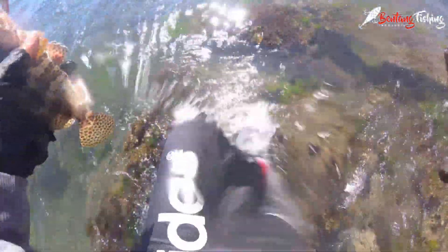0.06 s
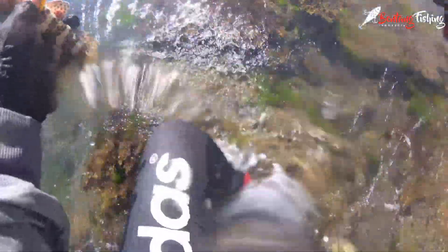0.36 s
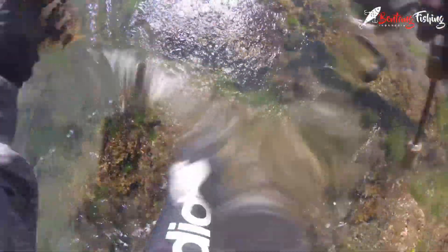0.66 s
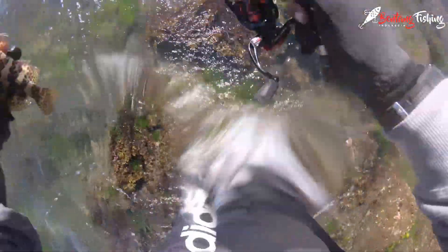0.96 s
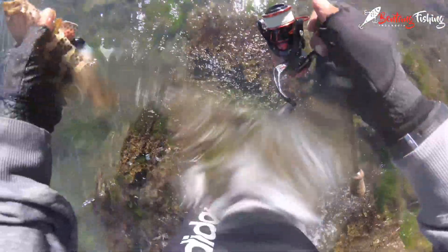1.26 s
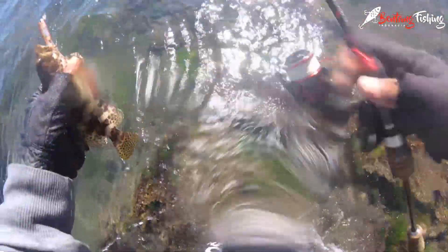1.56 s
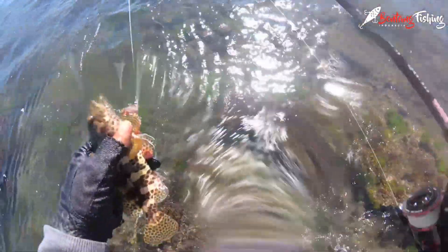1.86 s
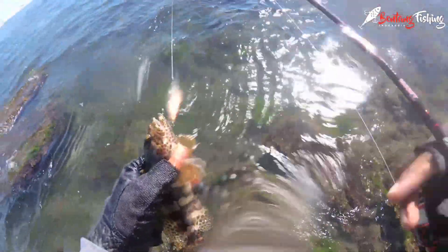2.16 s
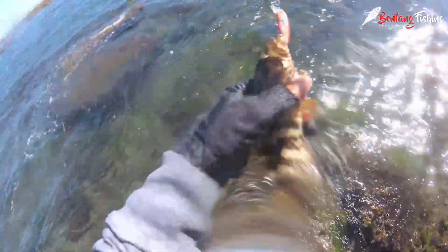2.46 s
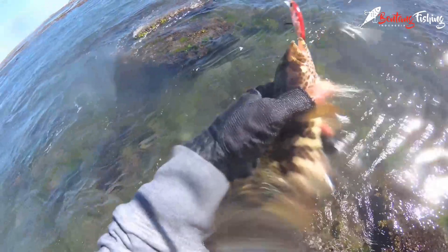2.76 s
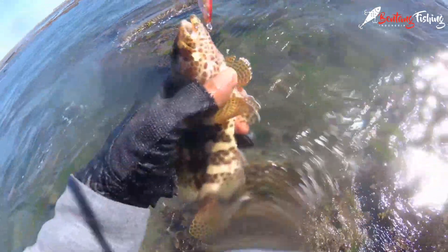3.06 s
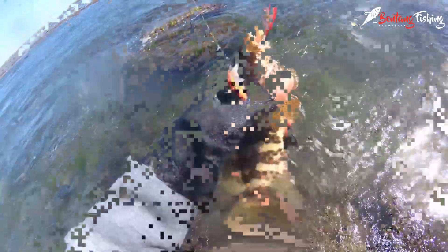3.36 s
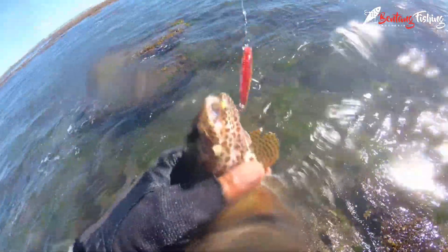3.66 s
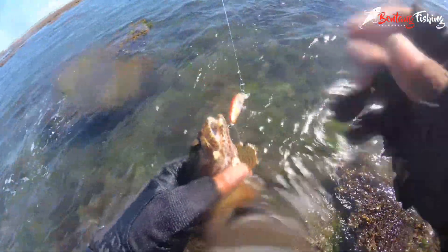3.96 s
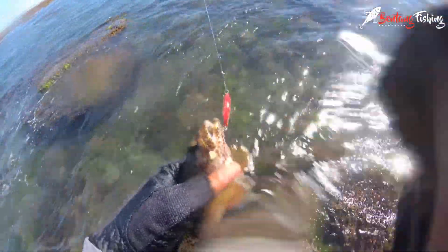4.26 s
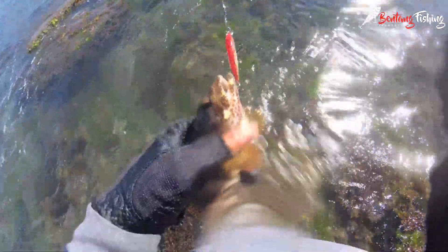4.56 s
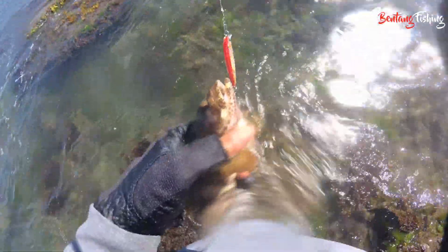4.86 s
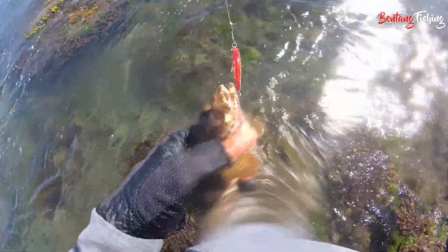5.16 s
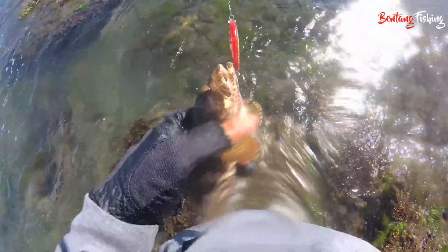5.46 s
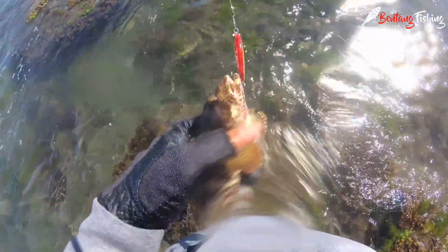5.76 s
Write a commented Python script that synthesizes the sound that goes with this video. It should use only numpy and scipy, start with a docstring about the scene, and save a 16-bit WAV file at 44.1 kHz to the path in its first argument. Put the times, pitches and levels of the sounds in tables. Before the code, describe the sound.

Heard from a camera worn by someone standing in the shallows, water swishes and bubbles quietly while gear gives a few light taps and a couple of sharper knocks. In the last part a glove takes hold of the plastic case, rubbing, sticking and creaking right at the microphone. Heavy thumps and clicks follow, far louder than the water, and the strongest ones distort.

```python
"""Water washes softly round someone's legs while gear taps; then come close scrapes, creaks and loud knocks.
An angler stands in shallow water, wearing a camera in a plastic housing. The water sounds through its
sloshing, bubbles and drops. Then a gloved hand takes hold of the housing: the fabric rubs, sticks
and slips on it, and the hand knocks it hard enough to overload the microphones."""
import sys
import numpy as np
from scipy import signal
from scipy.fft import rfft, irfft
from scipy.io import wavfile

SR = 44100
rng = np.random.default_rng(int(sys.argv[2]) if len(sys.argv) > 2 else 0)


def transcribe(u):
    """Save the signal u as a 16-bit wav file named by the first command-line argument.

    u: samples, shape (n,) or (channels, n), limited to [-1, 1]; the rate is SR.
    q: integer samples, one column per channel.
    """
    v = np.clip(np.atleast_2d(u).T, -1, 1)
    q = np.round(v * 32767).astype(np.int16)
    wavfile.write(sys.argv[1], SR, q)


N = 261336
TIME = np.arange(N) / SR
STROKE_RISE = 0.69  # share of a glove stroke spent pressing harder

# how alike water sounds at the two microphones: (frequency [Hz], likeness [-1 to 1])
WATER_LIKENESS = [(60, 1), (300, 0.7), (700, 0.9), (1400, 0.82), (3100, -0.02), (6000, 0)]
# the same for a touch on the housing: (frequency [Hz], likeness [-1 to 1])
TOUCH_LIKENESS = [(100, 0.92), (700, 0.94), (1500, 0.96), (3100, 0.18), (6500, -0.37), (12000, 0.22)]
# which side a touch is louder on: (frequency [Hz], left minus right [dB])
TOUCH_BALANCE = [(80, -6), (250, -3.5), (700, -3), (2300, -4), (4400, -10.5), (8000, -4), (15000, -8)]
# tone of fabric rubbing on plastic: (frequency [Hz], relative level [dB])
RUB_TONE = [(210, -34), (350, 4.5), (491, -5.5), (672, 4), (771, -7), (942, 1.5), (1040, -7.5), (1320, 1),
            (1850, -9.5), (2100, 0.5), (3060, -13), (3510, -2), (4240, -18), (5590, -10.5), (7000, -79),
            (9100, -53), (15400, -120)]


def amp(db):
    """Turns decibels into a gain to multiply by."""
    return 10 ** (np.asarray(db) / 20)


def evened(x):
    """Scales a sound to an average (rms) strength of 1."""
    return x / np.sqrt(np.mean(x ** 2) + 1e-20)


def read(points, hz):
    """Looks up a frequency in a table, blending between rows on a log scale."""
    row_hz, value = np.transpose(points)
    return np.interp(np.log(hz + 1), np.log(row_hz + 1), value)


def add(mix, start_s, sound):
    """Mixes a stereo sound in at its start time."""
    part = mix[:, max(round(start_s * SR), 0):][:, :sound.shape[1]]
    part += sound[:, :part.shape[1]]


def panned(db):
    """Left and right gains; positive dB is louder on the left."""
    return amp(np.array([db, -db]).reshape(2, -1) / 2)


def swell(peak_s, length, rise):
    """Climbs to 1 at peak_s and falls back; rise is the share of the length spent climbing."""
    times = [peak_s - rise * length, peak_s, peak_s + (1 - rise) * length]
    return np.interp(TIME, times, [0, 1, 0]) ** 0.58


def flutter(per_s):
    """A random wobble, up to about per_s times a second."""
    hz = np.fft.rfftfreq(N, 1 / SR)
    return evened(irfft(rfft(rng.standard_normal(N)) / (1 + (hz / per_s) ** 4), N))


def grains(tone, likeness, balance, per_s, grain_db):
    """Stereo noise of a given tone, made grainy by a flickering level."""
    hz = np.fft.rfftfreq(N, 1 / SR)
    noise = rng.standard_normal((2, N))
    flicker = amp(grain_db * np.clip(flutter(per_s), -2.5, 2.5))
    left, other = rfft(noise * flicker)
    alike = np.clip(read(likeness, hz), -1, 1)
    right = alike * left + np.sqrt(1 - alike ** 2) * other
    low_hz, high_hz = tone[0][0], tone[-1][0]
    edge_fade = 1 / np.sqrt((1 + (low_hz / 2 / (hz + 1)) ** 4) * (1 + (hz / 2 / high_hz) ** 4))
    pair = np.array([left, right]) * panned(read(balance, hz))
    sound = irfft(pair * amp(read(tone, hz)) * edge_fade, N)
    return sound / sound.mean(0).std()


def coloured(pulses, tone, size=4096):
    """Makes each pulse ring with the given tone after it lands."""
    log_gain = np.log(amp(read(tone, abs(np.fft.fftfreq(size, 1 / SR)))))
    ring = np.fft.ifft(np.exp(np.conj(signal.hilbert(log_gain)))).real
    return signal.oaconvolve(pulses, ring[:size // 2])[:N]


def touch_lag(hz):
    """How far out of step a note from the housing reaches the two microphones, in radians."""
    return np.arccos(np.clip(read(TOUCH_LIKENESS, hz), -1, 1))


def hiss(level_db=-57):
    """The microphones give a faint, steady hiss of their own."""
    # tone of the hiss: (frequency [Hz], relative level [dB])
    tone = [(1470, -5.5), (2500, -4), (3570, 0), (4310, -5), (5740, -5.5), (14600, -5.5), (15600, -8),
            (16000, -31)]
    balance = [(2500, 0.052), (15000, -0.024)]  # (frequency [Hz], left minus right [dB])
    return amp(level_db) * grains(tone, WATER_LIKENESS, balance, per_s=51, grain_db=0.63)


def droplets(per_s=260, spread_db=2.0, pitches=24):
    """Falling drops trap tiny bubbles, each a short rising ping."""
    out, t = np.zeros((2, N)), np.arange(SR // 60) / SR
    for hz in np.geomspace(1900, 5800, pitches):
        cycles = hz * rng.uniform(0.953, 0.958) * t
        fade = np.exp(-cycles / 7) * (1 - np.exp(-cycles))
        ping = fade * np.sin(2 * np.pi * cycles * (1 + 0.0057 * cycles))
        size = amp(spread_db * np.minimum(rng.exponential(1, N), 3.5))
        lands = rng.random(N) < per_s / pitches / SR
        out += signal.oaconvolve(size * lands, ping)[:N] * panned(rng.normal(1, 1.6))
    return evened(out)


def water(slosh_db=-45.5, lap_db=-50.5, spray_floor_db=-79, heave_db=-4.5, drops_db=-4):
    """Water sloshes and laps all the time; each swish heaves it and throws up froth, spray and drops."""
    # tones of slosh, lapping, bursting bubbles and spray: (frequency [Hz], relative level [dB])
    slosh_tone = [(25, -24), (60, -19), (115, -3.5), (170, -2), (240, 1.5), (330, -4), (450, -12),
                  (900, -18.5)]
    lap_tone = [(200, -15), (450, 2.5), (760, 6), (950, 5), (1120, -12), (1450, 4.5), (1700, -4),
                (1950, -33.5), (4000, -50.5)]
    froth_tone = [(400, -5), (700, -1.5), (930, 2), (1120, -4.5), (1450, 1.5), (1700, -3.5), (1950, -15.5),
                  (4000, -32)]
    spray_tone = [(900, -32), (1900, -3), (2500, 1), (3100, 2.5), (3600, 1.5), (4400, -8.5), (5500, -5),
                  (6600, -12), (15000, -18)]
    # which side the water is louder on: (frequency [Hz], left minus right [dB])
    balance = [(60, -7), (200, -3), (600, -2), (1300, -3.5), (4400, -9.5), (8000, -4.5)]
    # swishes round the legs: (peak time [s], length [s], froth level [dB], spray level [dB])
    swishes = [(0.194, 0.74, -51, -49.5), (0.442, 0.21, -48, -43), (0.589, 0.35, -37.5, -47),
               (0.84, 0.23, -43, -54.5), (1.049, 0.24, -42, -49), (1.196, 0.24, -45.5, -49),
               (1.385, 0.33, -65, -49), (2.141, 0.28, -43.5, -59.5), (2.36, .12, -43, -60),
               (2.573, 0.21, -39.5, -56.5), (2.955, 0.25, -40, -68), (3.427, 0.058, -41, -51.5),
               (3.7, 0.49, -46, -68), (4.137, 0.15, -46, -78)]
    froth_gain, spray_gain = np.zeros(N), amp(spray_floor_db)
    for peak_s, length, froth_db, spray_db in swishes:
        surge = swell(peak_s, length, rise=0.42)
        froth_gain = np.hypot(froth_gain, surge * amp(froth_db))  # hypot adds the power of two noises
        spray_gain = np.hypot(spray_gain, surge * amp(spray_db))
    slosh_gain = np.hypot(amp(slosh_db), amp(heave_db) * froth_gain)
    slosh = slosh_gain * grains(slosh_tone, WATER_LIKENESS, balance, per_s=25, grain_db=1.8)
    lap = amp(lap_db) * grains(lap_tone, WATER_LIKENESS, balance, per_s=89, grain_db=2.5)
    froth = froth_gain * grains(froth_tone, WATER_LIKENESS, balance, per_s=130, grain_db=3)
    spray = grains(spray_tone, WATER_LIKENESS, balance, per_s=180, grain_db=3)
    return slosh + lap + froth + spray_gain * (spray + amp(drops_db) * droplets())


def plops(fade_s=0.021):
    """A larger drop traps a bubble that rings, dying away by 60 dB in fade_s."""
    # trapped bubbles: (time [s], level [dB], pitch [Hz])
    bubbles = [(0.206, -28, 930), (1.177, -31, 830), (2.03, -41, 4080), (3.113, -33.5, 1370)]
    out, t = np.zeros((2, N)), np.arange(SR // 20) / SR
    for start_s, db, hz in bubbles:
        add(out, start_s, amp(db - 60 * t / fade_s) * np.sin(2 * np.pi * hz * t) * panned(-4))
    return out


def snags(per_s=420, spread_db=1.5):
    """Single threads catch and snap free at random, each a tiny click."""
    size = amp(spread_db * np.minimum(rng.exponential(1, N), 3))
    snaps = size * rng.choice([-1, 1], N) * (rng.random(N) < per_s / SR)
    return evened(coloured(snaps, RUB_TONE)) * panned(-4)


def glove(rest_rub_db=-45.5, rest_rumble_db=-37, rest_hiss_db=-49, snag_db=-8):
    """Fabric drags over the housing: each stroke swells and lets go as the fibres catch."""
    # the hand resting on the housing: (time [s], share of its weight [0 to 1])
    grip = [(4.37, 0.033), (4.41, 1), (5.33, 0.55), (5.42, 0.34)]
    # glove strokes: (peak time [s], length [s], rub level [dB], rumble level [dB], hiss level [dB])
    strokes = [(4.425, 0.066, -29, -32, -39), (4.486, 0.059, -23, -17.5, -33),
               (4.538, 0.061, -27.5, -26, -37), (4.619, 0.093, -24, -26, -27),
               (4.673, 0.07, -23.5, -25, -32), (4.979, 0.19, -32, -32, -37),
               (5.042, 0.095, -23.5, -24, -34), (5.107, 0.045, -39.5, -27, -39),
               (5.293, 0.19, -37.5, -38.5, -49.5), (5.366, 0.04, -32.5, -37, -39.5),
               (5.49, 0.047, -33.5, -35, -41.5), (5.605, 0.18, -43, -41, -54),
               (5.896, 0.13, -39.5, -34.5, -46.5)]
    # tones of the rubbing's low rumble and high hiss: (frequency [Hz], relative level [dB])
    rumble_tone = [(25, -9.5), (60, -14), (115, -5.5), (170, -1), (260, -0.5), (400, -16.5), (800, -11)]
    hiss_tone = [(3000, -17), (5500, 4), (7000, 5), (10000, -1), (13000, 0.5), (15000, -1.5)]
    held = np.interp(TIME, *np.transpose(grip))  # the resting hand never lies quite still
    gains = held * amp([[rest_rub_db], [rest_rumble_db], [rest_hiss_db]])
    for peak_s, length, *db in strokes:
        gains = np.maximum(gains, swell(peak_s, length, STROKE_RISE) * amp(db)[:, None])
    rub_gain, rumble_gain, hiss_gain = gains
    rub = grains(RUB_TONE, TOUCH_LIKENESS, TOUCH_BALANCE, per_s=160, grain_db=3.5)
    rub += amp(snag_db) * snags()
    rumble = grains(rumble_tone, TOUCH_LIKENESS, TOUCH_BALANCE, per_s=70, grain_db=2.5)
    high_hiss = grains(hiss_tone, TOUCH_LIKENESS, TOUCH_BALANCE, per_s=1100, grain_db=1)
    return rub_gain * rub + rumble_gain * rumble + hiss_gain * high_hiss


def rasps():
    """Where the fabric grips, it chatters around one pitch: a short, fuzzy squeak."""
    # fabric squeaks: (peak time [s], length [s], pitch [Hz], pitch width [Hz], level [dB])
    squeaks = [(4.426, 0.019, 1230, 403, -25), (4.603, 0.073, 3360, 1200, -24.5),
               (4.613, 0.11, 1555, 600, -25.5), (4.671, 0.036, 5550, 400, -24),
               (4.676, 0.05, 2127, 250, -23.5), (5.054, 0.023, 2100, 900, -23.5),
               (5.11, 0.042, 3640, 260, -32.5), (5.367, 0.03, 780, 340, -23),
               (5.369, 0.028, 1960, 864, -27.5), (5.48, 0.0076, 12100, 3500, -31.5)]
    out = np.zeros((2, N))
    for peak_s, length, hz, width_hz, db in squeaks:
        noise = rng.standard_normal(N) + 1j * rng.standard_normal(N)
        wobble = signal.lfilter(*signal.butter(2, width_hz / 2, fs=SR), noise)
        note = wobble * np.exp(2j * np.pi * hz * TIME)
        pair = evened(np.real([note, note * np.exp(1j * touch_lag(hz))]))
        out += amp(db) * swell(peak_s, length, STROKE_RISE) * pair * panned(read(TOUCH_BALANCE, hz))
    return out


def creaks():
    """The glove sticks and slips, one short pulse a slip; the slips speed up and slow with the pull."""
    # pulls of the glove, one list a creak: (time [s], slip rate [1/s], level [dB])
    pulls = [
        [(4.695, 330, -37.5), (4.712, 480, -28), (4.722, 680, -21.5), (4.735, 800, -32), (4.746, 950, -24.5),
         (4.758, 300, -39), (4.785, 117, -36)],
        [(4.795, 144, -38.5), (4.805, 174, -25), (4.813, 260, -25.5), (4.837, 290, -19.5), (4.847, 470, -19),
         (4.859, 474.8, -24.5), (4.879, 350, -21), (4.889, 320, -25), (4.9, 150, -21)],
    ]
    # tone of one slip: (frequency [Hz], relative level [dB])
    slip_tone = [(80, -9), (250, 8.5), (450, 4.5), (650, 6), (900, 3), (1150, -10), (1450, -4.5),
                 (2000, -31), (4000, -68)]
    slip_strength = np.linalg.norm(coloured(signal.unit_impulse(SR), slip_tone))
    out = np.zeros((2, N))
    for pull in pulls:
        times, slip_hz, db = np.transpose(pull)
        rate = np.interp(TIME, times, slip_hz) * (1 + 0.025 * flutter(140))
        slip_count = np.cumsum(rate * (TIME > times[0]) * (TIME < times[-1])) / SR
        slips = np.diff(np.ceil(slip_count), prepend=0) * np.sqrt(SR / rate)  # same power at any rate
        force = amp(np.interp(TIME, times, db) + 1.4 * flutter(200))
        out -= coloured(slips * force, slip_tone) / slip_strength * panned(-3.5)
    return out


def housing_ring(t, hardness_hz, pitch_spread=0.04):
    """The plastic shell rings with many notes at once; a soft touch leaves the high ones quiet."""
    # the shell's own notes: (pitch [Hz], relative level [dB], time to fade by 60 dB [s])
    shell_notes = [(238, -13, 0.041), (678, -8, 0.033), (858, 0.5, 0.016), (1230, 1, 0.012),
                   (1318, 0, 0.019), (1734, 4, 0.012), (2304, -6, 0.02), (2360, 4, 0.018),
                   (3220, 5, 0.0057), (3800, -5.5, 0.03), (5620, -14, 0.046), (7500, -5, 0.0089),
                   (8800, -12, .006), (13000, -8, .005)]
    hz, db, fade_s = np.transpose(shell_notes)[:, :, None]
    hz = hz * (1 + pitch_spread * rng.standard_normal(hz.shape))
    weight = amp(db) / np.sqrt(1 + (hz / hardness_hz) ** 6)
    sign = (-1) ** np.arange(len(hz))[:, None]  # neighbouring notes swing opposite ways
    fades = sign * weight * amp(-60 * t / fade_s) / np.linalg.norm(weight)
    return 0.5 * np.array([(fades * np.sin(2 * np.pi * hz * t + lag)).sum(0)
                           for lag in (0, touch_lag(hz))])


def thud(t, db, hz, fade_s, max_sag=0.36, hard_db=8.5):
    """The touched spot rocks and dies away; after a hard blow its pitch sags as the contact relaxes."""
    sag = max_sag * np.tanh(amp(db - hard_db))
    pitch = hz * (1 + sag * (2 * np.exp(-t / (0.23 * fade_s)) - 1))  # from above hz to below it
    return amp(db - 60 * t / fade_s) * np.sin(2 * np.pi * np.cumsum(pitch) / SR)


def contacts(tap_hardness_hz=1100, click_hardness_hz=5200, knock_cycles=3.2, click_cycles=13, pan_db=-4):
    """Lists every tap, knock and click on the housing, ready for knocks() to play."""
    # gear bumps the free housing: (time [s], thud level [dB], pitch [Hz], ring level [dB])
    gear_taps = [(.572, -23, 124, -22), (0.616, -22, 236, -16), (.657, -29, 112, -32),
                 (1.548, -38, 135, -21), (1.728, -34, 122, -18.5), (2.1983, -33, 210, -15),
                 (2.436, -37, 127, -19.5), (2.862, -22, 696, -42), (2.871, -16, 205.6, -40),
                 (2.9001, -4.5, 259, 1.5), (2.9861, -4, 700, -4.5), (2.991, -21.5, 244, -22),
                 (3.907, -40, 218, -16)]
    # the hand hits the housing and damps it:
    # (time [s], thud level [dB], pitch [Hz], ring level [dB], hardness [Hz], crack level [dB])
    hand_knocks = [(4.441, -2.5, 130, -31, 600, -35), (4.471, -1.5, 139, -21, 800, -40),
                   (4.4772, 0, 190, -10, 910, -38), (4.4869, -1, 113, -0.5, 1500, -33),
                   (4.5266, -6, 267, -6.5, 2410, -25), (4.7488, -7.5, 235, -4, 6000, -2),
                   (4.945, -21, 700, 13, 1670, -32), (5.089, -24, 260, -14, 2500, -29),
                   (5.423, -1.5, 470, 1, 1270, -21.5), (5.5056, 3, 487, 2.5, 3250, -1.5),
                   (5.5648, 21, 322, 11.5, 2300, 0.5), (5.6842, -6, 230, 9.5, 3880, 11),
                   (5.86, 16, 233, 6, 1660, 6), (5.8735, -28, 610, -2, 2160, -8.5)]
    # a hard edge catches on the shell: (time [s], level [dB], pitch [Hz], left minus right [dB])
    edge_clicks = [(4.371, -22, 1470, -11), (4.436, -12, 2270, 8), (4.7721, -11, 1830, -6),
                   (4.8928, -5.5, 2840, -14), (5.516, -18, 3500, 11), (5.599, -20, 2470, -15),
                   (5.642, -9.5, 3500, -10)]
    for start_s, db, hz, ring_db in gear_taps:
        fade_s = 0.049 * np.sqrt(197 / hz)  # low thuds last longer
        yield start_s, db, hz, fade_s, ring_db, tap_hardness_hz, 0, pan_db
    for start_s, db, hz, ring_db, hardness_hz, crack_db in hand_knocks:
        yield start_s, db, hz, knock_cycles / hz, ring_db, hardness_hz, amp(crack_db), pan_db
    for start_s, db, hz, side_db in edge_clicks:
        ring_db, crack_gain = db - 5, amp(db + 1)
        yield start_s, db, hz, click_cycles / hz, ring_db, click_hardness_hz, crack_gain, side_db


def knocks(attack_cycles=0.84, crack_s=0.0085, rattle_db=-29, rattle_s=0.079,
           murmur_db=-30, murmur_s=0.074, bass_cut_hz=70):
    """A blow thuds and rings the shell; hard contacts add a crack and a faint rattle."""
    # tone of a hard contact: (frequency [Hz], relative level [dB])
    crack_tone = [(1200, 2.5), (3300, 4.5), (5500, -0.5), (9000, -5.5), (14000, -4.5)]
    # the shell and the body behind it murmur on after a blow: (frequency [Hz], relative level [dB])
    murmur_tone = [(80, 7.5), (130, -26), (240, 18.5), (330, -35), (460, 19), (720, -13), (1080, 2),
                   (1450, -5), (1850, -15), (3600, -18), (6000, -47)]
    out, t = np.zeros((2, N)), np.arange(SR // 5) / SR
    crack_noise = grains(crack_tone, TOUCH_LIKENESS, TOUCH_BALANCE, per_s=1500, grain_db=1)
    murmur_noise = grains(murmur_tone, TOUCH_LIKENESS, TOUCH_BALANCE, per_s=40, grain_db=1.5)
    crack_fade = amp(-60 * t / crack_s) + amp(rattle_db - 60 * t / rattle_s)
    for start_s, thud_db, hz, fade_s, ring_db, hardness_hz, crack_gain, pan_db in contacts():
        piece = rng.integers(N - len(t)) + np.arange(len(t))
        onset = 1 - np.exp(-t * hardness_hz / attack_cycles)  # a harder contact takes hold sooner
        blow = thud(t, thud_db, hz, fade_s)
        ring = amp(ring_db) * housing_ring(t, hardness_hz)
        crack = 0.5 * crack_gain * crack_fade * crack_noise[:, piece]
        freedom = fade_s / 0.011  # a blow that the hand damps leaves a weak murmur too
        murmur = amp(ring_db + murmur_db - 60 * t / murmur_s) * freedom * murmur_noise[:, piece]
        add(out, start_s, onset * ((blow + ring) * panned(pan_db) + crack + murmur))
    # a small object gives off little deep bass
    return signal.lfilter(*signal.butter(2, bass_cut_hz, "highpass", fs=SR), out)


def scene():
    """Water all around, and the gloved hand right on the housing."""
    return water() + plops() + hiss() + glove() + rasps() + creaks() + knocks()


def record(dry, ceiling=0.95, treble_cut_hz=15600):
    """The hardest knocks overload the microphones and flatten; then the highest treble is cut."""
    flattened = np.clip(dry, -ceiling, ceiling)
    lowpass = signal.firwin(301, treble_cut_hz, window=("kaiser", 8), fs=SR)
    return signal.oaconvolve(flattened, lowpass[None], "same")


dry = scene()
out = record(dry)
transcribe(out)
```